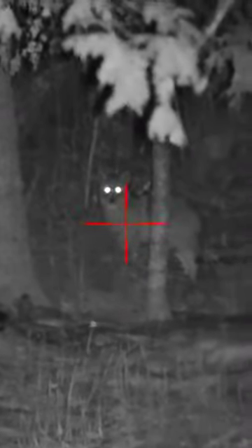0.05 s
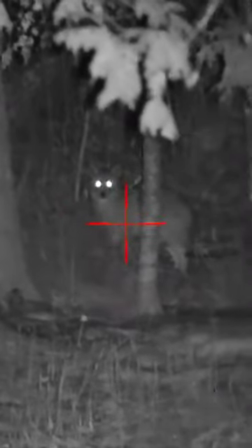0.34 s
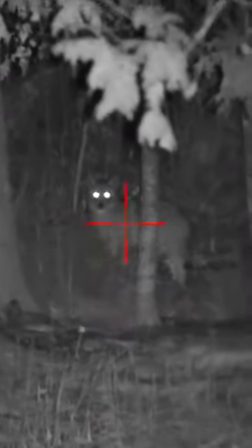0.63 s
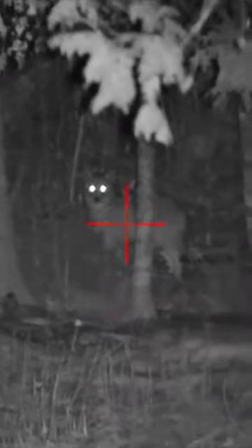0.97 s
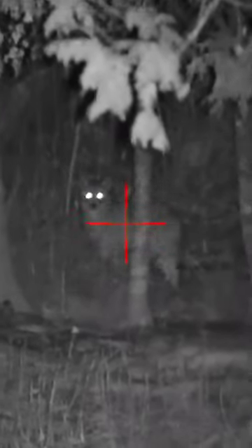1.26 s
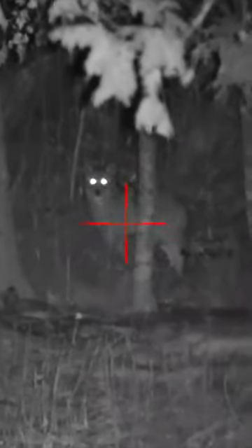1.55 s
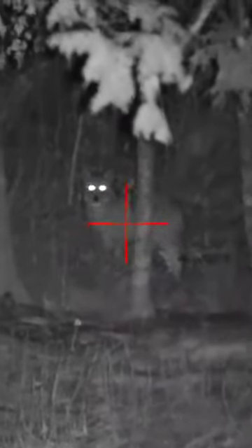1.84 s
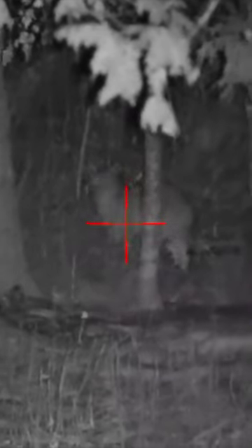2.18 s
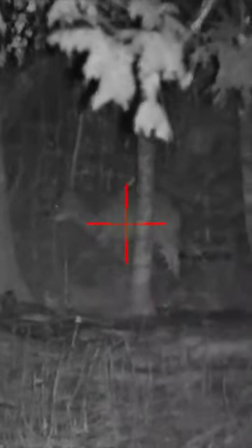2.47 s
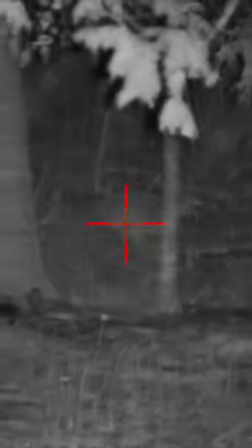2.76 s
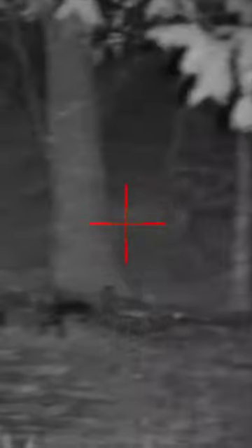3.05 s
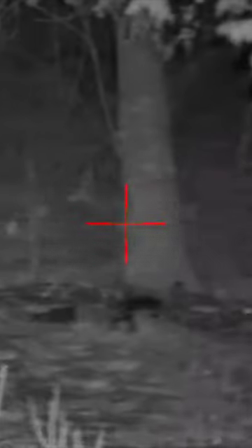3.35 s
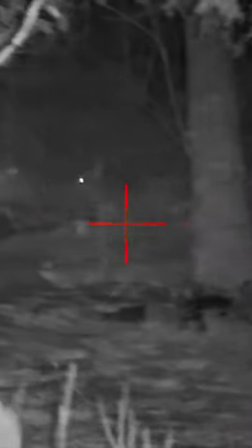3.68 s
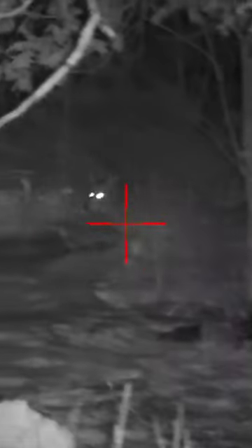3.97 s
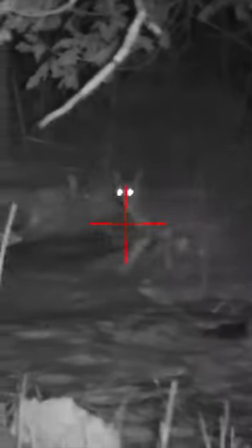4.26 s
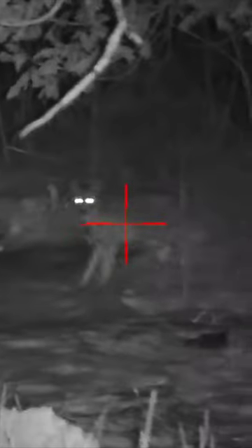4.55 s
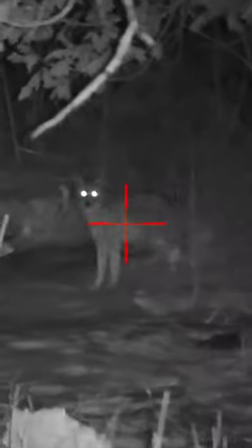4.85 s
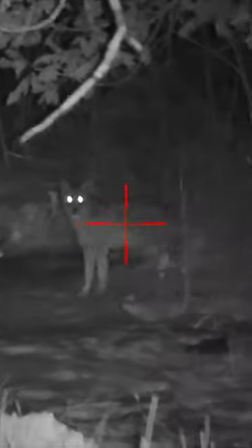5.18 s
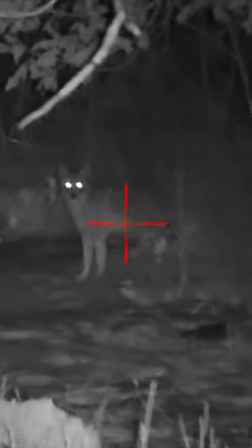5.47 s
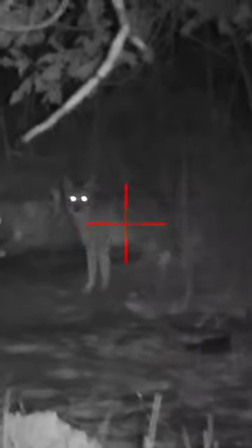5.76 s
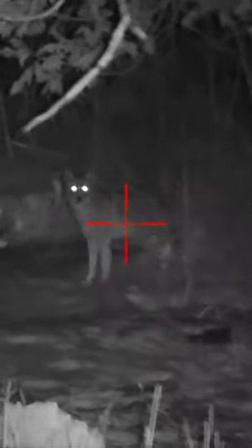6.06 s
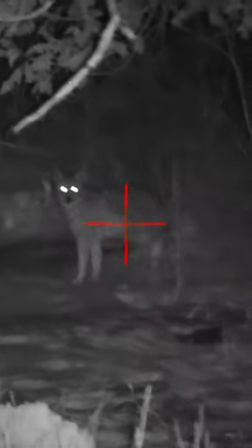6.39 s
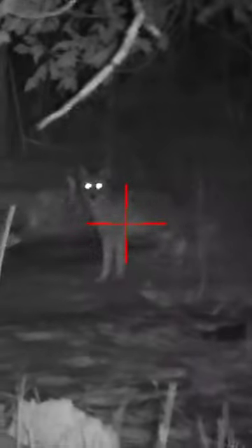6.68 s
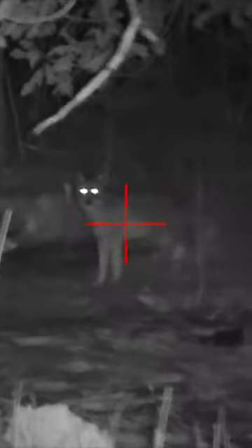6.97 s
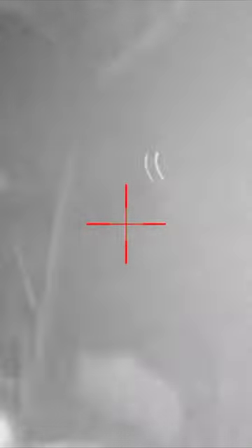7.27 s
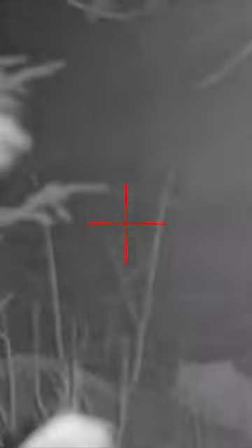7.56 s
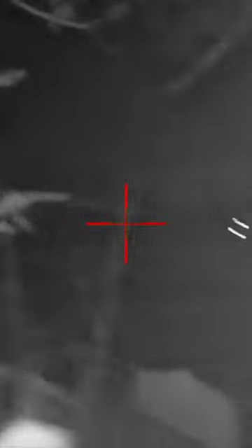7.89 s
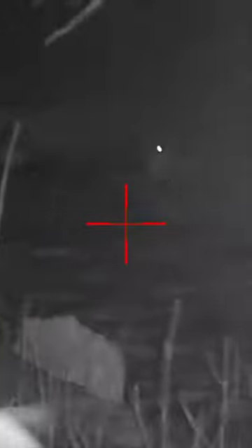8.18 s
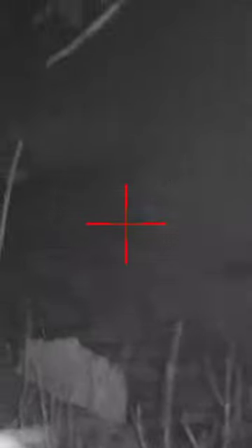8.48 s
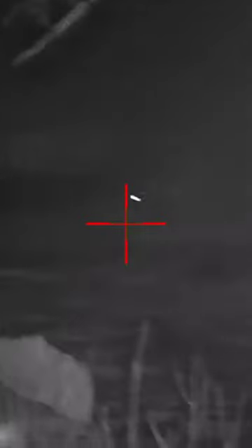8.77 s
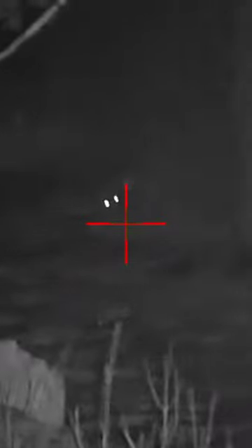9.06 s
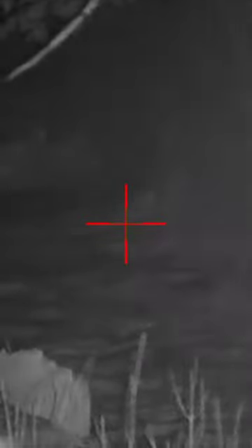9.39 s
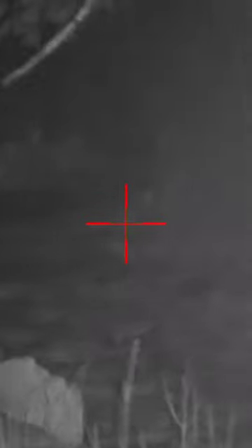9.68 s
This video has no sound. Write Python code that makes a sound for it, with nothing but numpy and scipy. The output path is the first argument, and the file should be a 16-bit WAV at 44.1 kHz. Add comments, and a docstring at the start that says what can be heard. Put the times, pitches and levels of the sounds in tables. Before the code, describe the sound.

A faint, steady electronic hiss and buzz runs for several seconds, with the odd slight rustle. Then a rifle fires once, sharp and distorted, right beside the small microphone of its night scope. A low roll and a dulling echo spread through the forest as the bolt clacks open and shut. Two small clicks and soft handling rustles follow, and the hiss remains.

```python
"""A wood at night: one rifle shot, heard through the small microphone of a night-vision scope.
Two pressure fronts overload the microphone, and a limiter ducks everything. Sound scattered by the trees
rolls back, dulled by air absorption, while the action is worked: impacts ring the rifle's modes and the
bolt slides. The echo dies away among faint rustles, over the hiss and buzz of the scope's electronics."""
import sys
import numpy as np
from scipy import signal
from scipy.fft import rfft, irfft
from scipy.io import wavfile
from scipy.ndimage import uniform_filter1d

SR = 44100
rng = np.random.default_rng(int(sys.argv[2]) if len(sys.argv) > 2 else 0)


def unload_audio(sound):
    """Save the sound as a 16-bit wav file, at the path given as the first command line argument."""
    columns = np.transpose(np.atleast_2d(sound))
    # keep every value between -1 and 1, then stretch to whole-number steps
    steps = np.round(np.clip(columns, -1, 1) * 32767)
    wavfile.write(sys.argv[1], SR, steps.astype(np.int16))


N = 433503
TIME = np.arange(N) / SR
SHOT_S = 7.0657

# Spectrum of steel on steel, sliding or ticking: frequency_hz, density_db
STEEL_SPECTRUM = [(2000, -20), (4500, 6), (7500, 2), (10000, -7), (13000, -12)]


def muzzle_blast(front_s=0.0041, gas_db=-4, boom_hz=1050, port_hz=480, ceiling=0.68):
    """Shock excitation: each front is a brief rush of gas that rings the microphone and saturates it."""
    # Pressure fronts: start_s, level_db, relative_boom_db, microphone_ring_hz
    fronts = [(7.0658, -7, 2.5, 4570), (7.0715, -7.5, -9, 5100)]
    # Spectrum of the rushing gas: frequency_hz, density_db
    gas_spectrum = [(100, -27), (500, -12), (1100, -6), (1900, -16), (3000, -3), (4600, -6.5), (6200, -1),
                    (7600, -10.5), (9200, -19.5), (13000, -17)]
    out, t = np.zeros(N), TIME[:2048]
    window = (1 - dying(t, 0.0048)) * np.exp(-(t / front_s) ** 4)
    for start_s, level_db, boom_db, ring_hz in fronts:
        rush = amp(gas_db) * noise(gas_spectrum, len(t)) + ring(t, ring_hz, t60=0.027)
        boom = amp(boom_db) * ring(t, boom_hz, t60=0.0076)
        add(out, start_s, amp(level_db) * (window * rush + boom))
    port = signal.butter(1, port_hz, "highpass", fs=SR, output="sos")  # a tiny port passes little bass
    return ceiling * np.tanh(signal.sosfilt(port, out) / ceiling)


def microphone_overload(offset_db=-5, leak_t60=2.58):
    """Baseline shift: the blast pushes the microphone off centre; the inaudible offset leaks away."""
    age = since(SHOT_S)
    return amp(offset_db) * swelling(age, rise_s=0.045) * dying(age, leak_t60)


def forest_echo(level_db=-7.5, patchy_db=1.5, flutter_db=0.5, colour_s=7.425):
    """Scattering: ever more trunks return the shot in clumps; air absorption dulls the late arrivals."""
    # Spectrum of the echo at time colour_s: frequency_hz, density_db
    echo_spectrum = [(100, -51), (190, -37.5), (290, -9), (430, -3.5), (580, 0.5), (800, -5), (1250, -6.5),
                     (1600, -10), (3100, -9.5), (4400, -3), (5200, -13), (6300, -27), (8500, -39.5),
                     (13000, -63)]
    # Air absorption on top of the overall decay: frequency_hz, extra_loss_db_per_s
    air_loss = [(250, 1.5), (550, -0.5), (1200, 5), (2500, 13), (4500, 20), (9000, 29)]
    hz, t, bands = signal.stft(noise(echo_spectrum, N), SR, nperseg=512, noverlap=384)
    patches = uniform_filter1d(rng.standard_normal(bands.shape), 7, axis=0)
    patches = evened(uniform_filter1d(patches, 8, axis=1))
    clumps = evened(uniform_filter1d(rng.standard_normal(len(t)), 5))
    loss_db = read(air_loss, hz)[:, None] * (np.maximum(t, SHOT_S) - colour_s)
    bands *= amp(patchy_db * patches + flutter_db * clumps - loss_db)
    echo = signal.istft(bands, SR, nperseg=512, noverlap=384)[1][:N]
    age = since(SHOT_S)
    return amp(level_db) * echo * swelling(age, rise_s=0.48) * dying(age, t60=3.675)


def near_trees(level_db=-17.5, hold_s=0.075):
    """Early reflections: the closest trunks answer at once; their scatter holds briefly, then drops."""
    # Spectrum of the near scatter: frequency_hz, density_db
    scatter_spectrum = [(70, -64), (170, -33), (300, -20), (590, -10.5), (1400, -6.5), (1700, -10),
                        (3100, -8.5), (4500, -0.5), (6000, -12.5), (7400, -21), (14000, -26)]
    envelope = swelling(since(SHOT_S), rise_s=0.007) ** 2 * dying(since(SHOT_S + hold_s), t60=0.092)
    return amp(level_db) * noise(scatter_spectrum, N) * envelope


def ground_roll(level_db=-12):
    """Ground reflection: the shot returns as a low roll that swells and dies."""
    # Spectrum of the roll: frequency_hz, density_db
    roll_spectrum = [(100, -48), (180, -19), (280, -2), (430, -2), (560, -7), (750, -26), (2000, -52)]
    age = since(SHOT_S)
    return amp(level_db) * noise(roll_spectrum, N) * swelling(age, rise_s=0.12) * dying(age, t60=0.5)


def rifle_action(skirt_db=-31, contact_band_hz=(220, 5200)):
    """Modal ringing: dull blows excite low modes, sharp ones high; each ticks, rebounds and rattles."""
    # Knocks and clicks of the action; rattle, tick and rebound levels are relative to level_db:
    # start_s, level_db, centre_hz, spread_octaves, rattle_db, tick_db, rebound_delay_s, rebound_db
    knocks = [(7.126, -16, 5900, 0.22, 2, -16, 0.0036, -14), (7.204, -13, 5500, .7, -14, -14, .002, -14),
              (7.6729, 0, 700, 1.68, -12, -36, 0.0021, 3.5), (7.8714, -3, 1440, 1.18, -14, -40, 0.0098, -1),
              (8.027, -4, 3970, .34, -17.5, -38, .0217, -5.5), (8.611, -36.5, 3500, .7, -8, -30, .012, -12),
              (8.692, -29.5, 4800, 0.51, -7.5, -11, 0.036, -10.5)]
    # Modes of the rifle: pitch_hz, level_db, t60_s
    modes = [(267, 1.5, 0.017), (417, 10.5, 0.0086), (1090, 2, 0.012), (1520, 3, 0.012), (2040, 6, 0.0077),
             (2460, -4, 0.015), (3670, 1, 0.0033), (4160, -3.5, 0.011), (4900, 2.5, 0.0035),
             (2690, -16, 0.14), (3930, -29, 0.13), (4124, -56, 0.092)]
    # Spectrum of the loose parts: frequency_hz, density_db
    rattle_spectrum = [(100, -40), (200, -37), (450, 7.5), (1500, 4), (3000, -0.5), (4400, 8.5),
                       (5200, 0.5), (6200, -7.5), (9000, -17), (13500, -27)]
    out, t = np.zeros(N), TIME[:8192]
    # Small parts give no bass, and no blow is instant, which limits the treble.
    contact = signal.butter(4, contact_band_hz, "bandpass", fs=SR, output="sos")
    shaking = (1 - dying(t, 0.0037)) ** 2 * dying(t, t60=0.14)  # loose parts take a moment to shake
    for start_s, level_db, centre_hz, spread, rattle_db, tick_db, rebound_s, rebound_db in knocks:
        def blow_db(hz):
            """Excitation spectrum: a Gaussian in octaves, with a floor."""
            distance = np.log2(hz / centre_hz) / spread
            return np.maximum(-10 * np.log10(np.e) * distance ** 2, skirt_db)

        body = sum((-1) ** k * amp(mode_db + blow_db(hz)) * ring(t, hz, t60)
                   for k, (hz, mode_db, t60) in enumerate(modes))
        body = signal.sosfilt(contact, body / abs(body).max())
        for hit_s, hit_db in [(start_s, level_db), (start_s + rebound_s, level_db + rebound_db)]:
            rattle = noise([(hz, db + blow_db(hz)) for hz, db in rattle_spectrum], len(t)) * shaking
            add(out, hit_s, amp(hit_db) * (body + amp(rattle_db) * rattle))
        tick = noise(STEEL_SPECTRUM, len(t)) * dying(t, t60=0.011)
        add(out, start_s, amp(level_db + tick_db) * tick)
    return out


def knock_dips(t60=0.225):
    """Ducking: a short, inaudible offset drives the limiter, so the level dips briefly."""
    # Two loud knocks after which everything dips briefly and swells back: start_s, offset_db, rise_s
    dips = [(7.673, 16, 0.043), (8.028, -0.5, 0.027)]
    return sum(amp(offset_db) * swelling(since(start_s), rise_s) ** 2 * dying(since(start_s), t60)
               for start_s, offset_db, rise_s in dips)


def bolt_slide(start_s=7.88, length_s=0.14, level_db=-49):
    """Sliding friction: steel rubs on steel with a thin hiss that follows the speed of the bolt."""
    speed = np.sin(np.pi * np.minimum(since(start_s) / length_s, 1))
    return amp(level_db) * noise(STEEL_SPECTRUM, N) * speed


def rustles(swing_s=8.72, swing_db=-56, fade_db_per_s=1.5, gap_s=0.036, scatter_db=3, faint_t60=0.13):
    """Incoherent bursts add in power: a few clear rustles, and a fading run as the rifle is swung."""
    # The clearest rustles and ticks: start_s, level_db, t60_s
    clear = [(3.6368, -54, .17), (4.2712, -52, .04), (4.5078, -57, .06), (6.236, -55.5, .06),
             (9.1922, -50, .08), (9.4504, -53, .15)]
    # Spectrum of the rustling: frequency_hz, density_db
    rustle_spectrum = [(1000, -20), (2800, -5), (3900, -1), (4600, 4), (5400, -14), (9000, -21)]
    power, t = np.zeros(N), TIME[:8192]
    gaps, sizes = rng.uniform(-1, 1, size=(40, 2)).T
    ages = np.cumsum(gap_s * (1 + gaps))
    faint = [(swing_s + age, swing_db - fade_db_per_s * age + scatter_db * size, faint_t60)
             for age, size in zip(ages, sizes)]
    attack = 1 - dying(t, 0.0017)
    for start_s, level_db, t60 in [*clear, *faint]:
        add(power, start_s, (amp(level_db) * attack * dying(t, t60)) ** 2)
    return np.sqrt(power) * noise(rustle_spectrum, N)


def scope_electronics(hiss_db=-59, buzz_db=-64, frame_hz=29.97, whine_hz=719.3):
    """Self-noise: steady hiss, a thin whine, and a buzz from periodic surges of sensor current."""
    # Surges in each picture that the sensor reads out: delay_ms, relative_db
    surges = [(4.1, 11.5), (8.05, 4.5), (10.9, 4), (20.7, 4.5), (28.4, 12.5), (33.0, -7.5)]
    # Spectral envelope of the buzz: frequency_hz, gain_db
    buzz_spectrum = [(60, -40), (120, -15), (150, -12.5), (180, 3), (260, -2.5), (450, 0), (650, -6),
                     (1000, -27), (2000, -24), (5000, -47)]
    # Partials of the whine: harmonic_number, rms_db
    harmonics = [(1, -66), (2, -78.5), (3, -83.5)]
    # Spectrum of the hiss: frequency_hz, density_db
    hiss_spectrum = [(30, -29), (110, -18), (200, -10), (300, 1.5), (520, -1.5), (1000, -4), (2000, -6.5),
                     (3700, -7.5), (4550, -5), (5300, -10), (9500, -13.5), (12400, -11.5), (12900, -6),
                     (13600, -17)]
    pulses = np.zeros(N)
    frame_starts = np.arange(0, N / SR, 1 / frame_hz)
    for delay_ms, db in surges:
        at = np.round((frame_starts + delay_ms / 1000) * SR).astype(int)
        pulses[at[at < N]] += amp(db)
    buzz = signal.hilbert(coloured(pulses, buzz_spectrum)).imag  # each surge swings one way, then back
    whine = sum(amp(db) * np.sqrt(2) * np.sin(2 * np.pi * k * whine_hz * TIME) for k, db in harmonics)
    return amp(hiss_db) * noise(hiss_spectrum, N) - amp(buzz_db) * buzz + whine


def limiter_gain(x, threshold_db=-30, recover_db_per_s=135, lag_s=0.0059):
    """Gain reduction: it comes late, so attacks pass; it then ducks everything and climbs back."""
    window = np.hanning(400)
    power_db = 10 * np.log10(signal.lfilter(window / window.sum(), 1, x ** 2) + 1e-12)
    release_db = recover_db_per_s * TIME
    held_db = np.maximum.accumulate(power_db + release_db) - release_db
    excess_db = uniform_filter1d(np.maximum(held_db - threshold_db, 0), size=120)
    return amp(-np.interp(TIME - lag_s, TIME, excess_db))


def amp(db):
    """Decibels to amplitude ratio."""
    return 10 ** (np.asarray(db) / 20)


def evened(x):
    """Normalisation to rms 1."""
    return x / np.sqrt(np.mean(x ** 2) + 1e-20)


def read(points, hz):
    """Interpolation along a log-frequency axis."""
    frequencies, values = np.transpose(points)
    return np.interp(np.log(hz + 1), np.log(frequencies + 1), values)


def coloured(x, spectrum):
    """Spectral shaping at rms 1, so only the spectrum's relative levels count."""
    gain = amp(read(spectrum, np.fft.rfftfreq(len(x), 1 / SR)))
    return evened(irfft(rfft(x) * gain, len(x)))


def noise(spectrum, size):
    """Coloured Gaussian noise at rms 1."""
    return coloured(rng.standard_normal(size), spectrum)


def since(start_s):
    """Seconds since start_s; zero before it."""
    return np.maximum(TIME - start_s, 0)


def swelling(t, rise_s):
    """Gaussian onset from 0 to 1."""
    return 1 - np.exp(-(t / rise_s) ** 2)


def dying(t, t60):
    """Exponential decay by 60 dB in t60 seconds."""
    return np.exp(-np.log(1000) * t / t60)


def ring(t, hz, t60):
    """Damped oscillation of one struck mode."""
    return np.sin(2 * np.pi * hz * t) * dying(t, t60)


def add(mix, start_s, sound):
    """Superposition of a sound on the mix from start_s."""
    part = mix[round(start_s * SR):][:len(sound)]
    part += sound[:len(part)]


def scene():
    """Superposition of everything that reaches the scope's amplifier."""
    shot = muzzle_blast() + microphone_overload()
    reflections = forest_echo() + near_trees() + ground_roll()
    action = rifle_action() + knock_dips() + bolt_slide()
    return (shot + reflections + action + scope_electronics() + rustles())[None]


def record(dry, low_cut_hz=75, high_cut_hz=13850):
    """Band limiting and gain control: the low cut removes the offsets, which still drive the limiter."""
    low_cut = signal.butter(3, low_cut_hz, "highpass", fs=SR, output="sos")
    high_cut = signal.firwin(401, high_cut_hz, window=("kaiser", 8), fs=SR)
    ducked = signal.sosfilt(low_cut, dry[0]) * limiter_gain(dry[0])
    return signal.oaconvolve(ducked, high_cut, "same")[None]


dry = scene()
out = record(dry)
unload_audio(out)
```